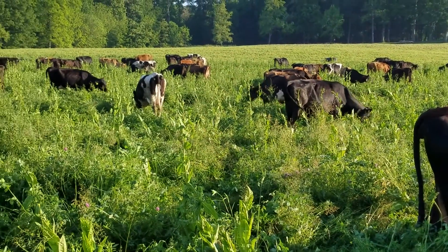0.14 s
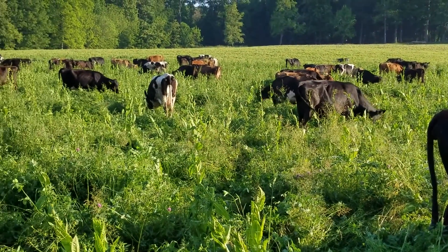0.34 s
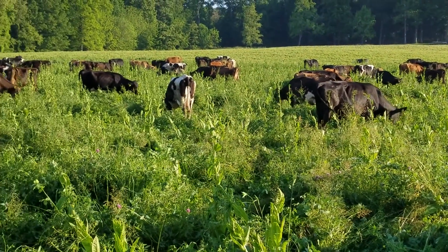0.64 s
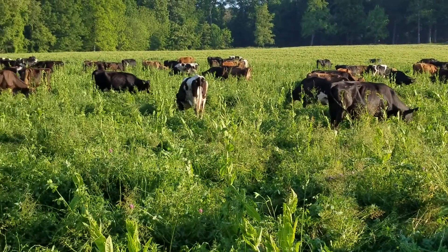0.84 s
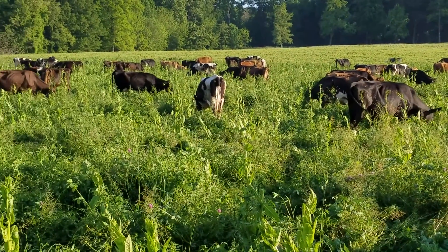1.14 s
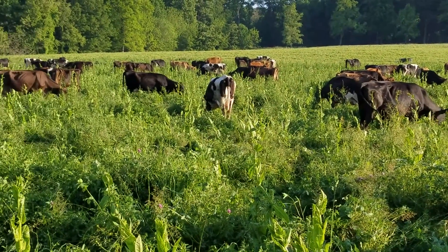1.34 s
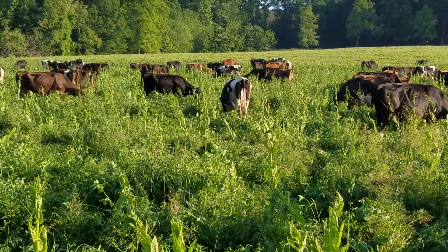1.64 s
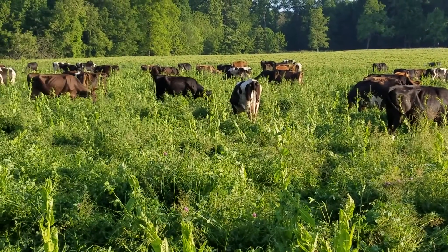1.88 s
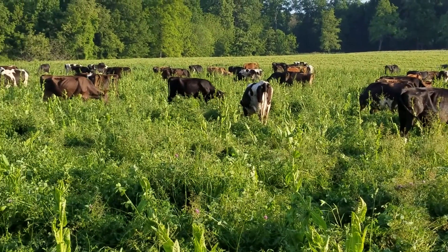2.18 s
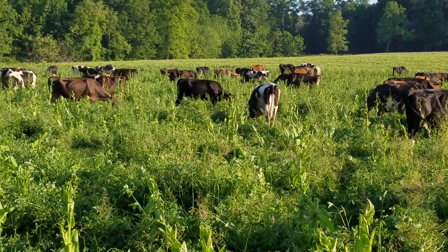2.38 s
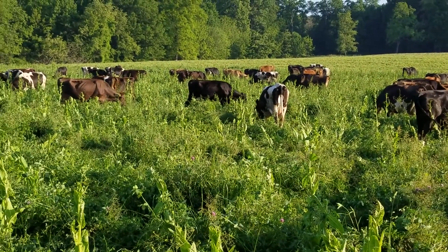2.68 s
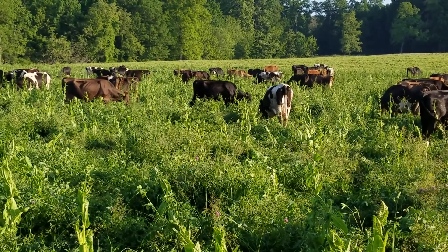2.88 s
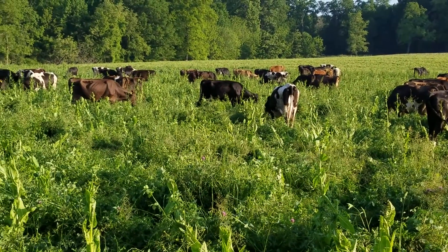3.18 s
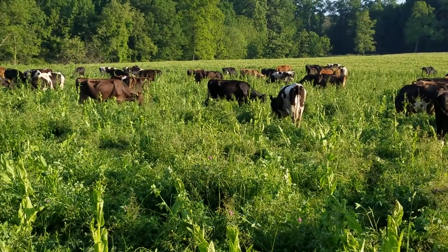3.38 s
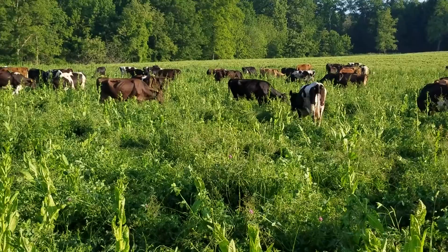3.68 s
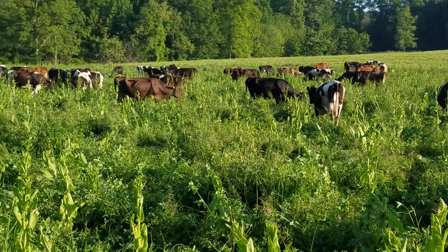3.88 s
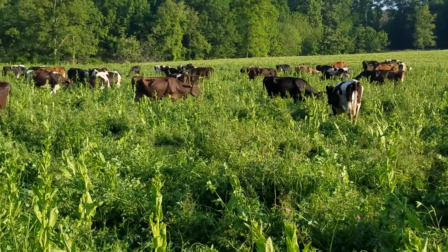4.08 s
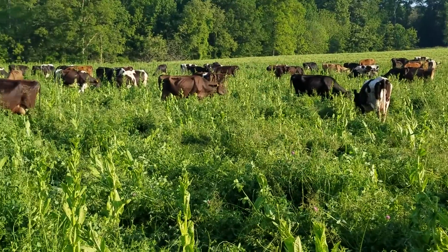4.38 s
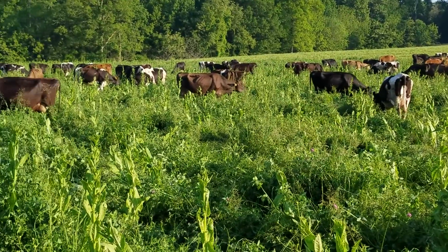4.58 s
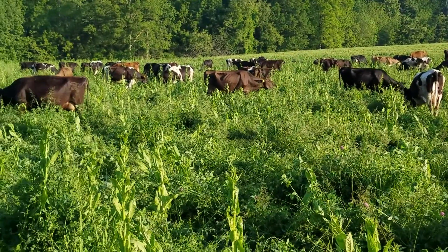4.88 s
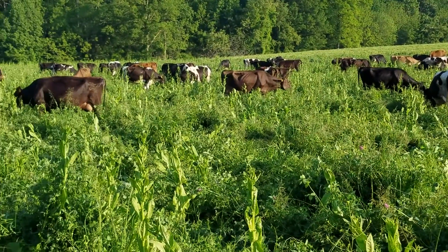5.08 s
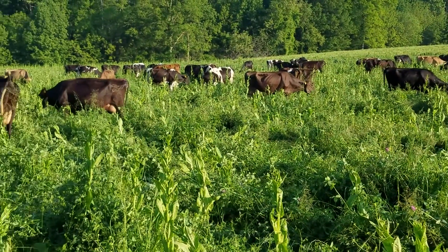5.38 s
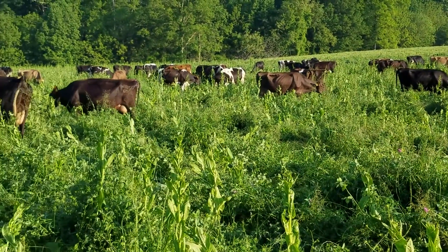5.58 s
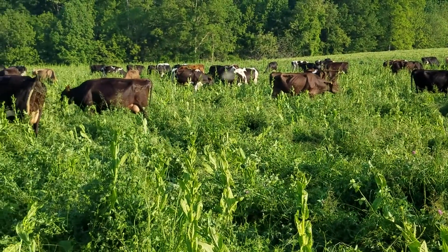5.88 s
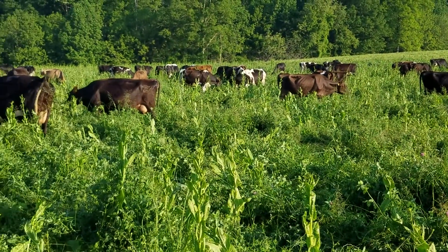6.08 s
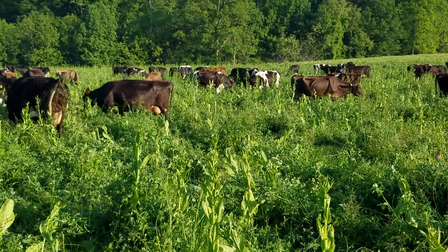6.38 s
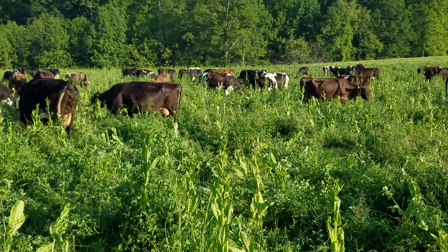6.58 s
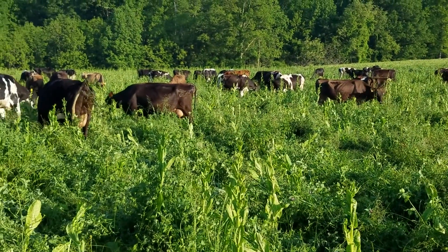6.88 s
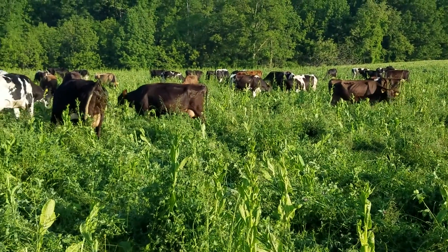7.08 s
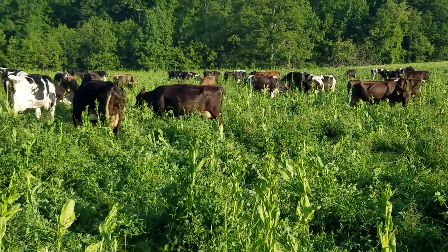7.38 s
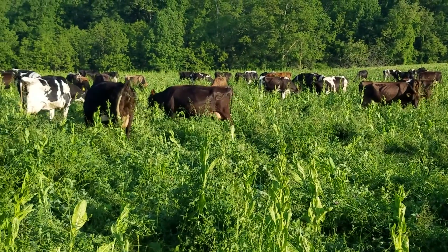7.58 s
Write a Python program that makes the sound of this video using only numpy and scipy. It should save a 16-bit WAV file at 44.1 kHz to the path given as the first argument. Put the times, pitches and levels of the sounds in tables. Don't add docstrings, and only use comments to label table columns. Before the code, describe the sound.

Cows tear grass in crisp crackling bursts and stem snaps while small birds whistle and chip over a low, distant engine drone.

```python
import sys
import numpy as np
from scipy import signal
from scipy.fft import rfft, irfft
from scipy.io import wavfile

SR = 44100
rng = np.random.default_rng(int(sys.argv[2]) if len(sys.argv) > 2 else 0)


def unload_audio(sound):
    columns = np.transpose(np.atleast_2d(sound))
    steps = np.round(np.clip(columns, -1, 1) * 32767)
    wavfile.write(sys.argv[1], SR, steps.astype(np.int16))


def to_linear_factor(level_db):
    exponent = np.asarray(level_db, float) / 20
    return 10 ** exponent


N = 341404

# frequency in Hz, left and right density in dB per Hz, likeness 0-1.
DRONE_DENSITY = [(23, -79.5, -84.5, 0.99), (40, -70, -66, .995), (56, -58, -61, 1), (96.3, -59, -59.5, 1),
                 (136.7, -66, -67, 0.96), (166.7, -65.5, -69, 0.98), (185.6, -75.5, -77, 0.95),
                 (326, -79, -78.5, 0.7), (463, -80.5, -79, 0.85), (610, -82.5, -81, 0.27),
                 (985, -81, -80.5, 0.93), (1570, -91.5, -85.5, 0.56), (1950, -89, -88.5, 0.5),
                 (2344, -102, -102, 0.02)]
# frequency in Hz, wander in Hz, level in dB rms.
ENGINE_ORDERS = [(80.7, .9, -47.5), (120, 3.0, -50), (145.3, .35, -49), (161.8, .6, -50.5), (217, 4.0, -63),
                 (473.7, .25, -64), (524, 2.0, -68)]
# frequency in Hz, lead in radians.
PORT_LEAD = [(0, 0), (340, .5), (1120, 3), (1890, 6), (2600, 8)]
# frequency in Hz, left and right density in dB per Hz.
HUSH_DENSITY = [(2120, -94.5, -97), (2300, -96, -99), (2760, -96.5, -99.2), (3400, -104.6, -99.8),
                (3900, -107.2, -102.2), (4630, -109.2, -106.9), (5870, -114.7, -111.0),
                (7200, -118.3, -113.4), (8350, -121.5, -111.6), (10420, -121.0, -106.6),
                (11500, -116.6, -111.3), (12800, -110.4, -113.4), (14200, -112.5, -111.8),
                (15400, -110.7, -110.3)]
# frequency in Hz, left and right gain in dB.
PORT_COLOUR = [(1383, 0.5, 0), (2900, -1, -2.5), (3700, -4.5, 2), (4050, -6.5, 0), (4800, 1.5, -1.5),
               (5500, 0.5, 2.5), (6530, 1, 2), (7400, 0, 4.5)]

# start after the syllable in seconds, length in seconds,
# start and end pitch in Hz, level in dB rms.
ZIGZAG = [(0, 0.05, 6650, 7660, -72.5), (.06, .022, 5280, 5800, -68), (.078, 0.0177, 5800, 5830, -66),
          (.094, .018, 5500, 4350, -63), (.108, .022, 4350, 3350, -57), (.157, 0.027, 4616, 4676, -59.5)]
ARCH = [(0.0029, 0.066, 5630, 6150, -62)]
HUMP = [(0, 0.042, 3250, 4450, -53), (.026, .05, 4050, 4980, -59.5), (.066, .03, 4950, 4800, -65),
        (.086, 0.042, 4620, 4000, -56)]
VEE = [(0, 0.024, 4250, 3238, -54.5), (.052, 0.053, 3400, 4220, -55)]
FALL = [(0, .022, 4950, 4050, -63), (.014, 0.026, 4220, 3500, -60.5)]
CLIMB = [(0, 0.056, 2900, 3950, -60.5), (.04, .048, 3660, 4900, -66)]
CHIP = [(-.006, 0.01607, 3290, 4140, -65), (0, .025, 3746, 5020, -56), (.021, 0.011, 5080, 3930, -63)]
WIGGLE = [(.008, .018, 3570, 2650, -59), (.021, .014, 2750, 3150, -54), (.03, .012, 3150, 2750, -60),
          (.041, .026, 2700, 3230, -52.5), (.057, .022, 3080, 3600, -57), (.077, .016, 3180, 2700, -56.5)]
CHUP = [(-.008, .014, 3550, 2900, -55), (.002, 0.0191, 2993, 2760, -60), (.024, .012, 3050, 2750, -62)]
SLIDE = [(0, 0.054, 3820, 3200, -53.5)]
DROP = [(0.0011, 0.049, 5700, 2400, -64)]
TICK = [(0, 0.018, 3524, 4750, -57.5), (.017, 0.0159, 4760, 3170, -60.5)]
WHISTLE = [(0, .031, 4900, 5300, -64), (.094, .15, 5220, 4850, -66)]
# start in seconds, length in seconds, start and end pitch in Hz, level in dB rms.
DROOP = [(4.535, 0.13, 4820, 4810, -67.5)]
LONE_RIGHT = [(.015, .04, 3990, 3930, -65), (1.345, .03, 5200, 5050, -73), (1.395, 0.062, 4353, 4200, -62),
              (1.74, 0.028, 3800, 3740, -65), (3.05, 0.016, 3620, 2700, -54.5),
              (3.6, 0.043, 3720, 3760, -74), (3.895, .016, 5000, 4700, -67),
              (4.62, 0.045, 2120, 2400, -68.5), (4.665, .02, 4730, 4600, -65),
              (4.703, 0.02, 3880, 3880, -57), (2.728, .022, 4350, 4600, -58), (2.29, .03, 3200, 3100, -63),
              (3.55, .012, 4300, 3900, -65), (3.672, .012, 4300, 3900, -65), (5.64, .014, 4236, 3750, -68),
              (5.81, .02, 4155, 4100, -67.5), (6.04, 0.0155, 3900, 4700, -59.5),
              (6.14, .022, 5600, 5300, -70), (6.158, .028, 5280, 5600, -68),
              (6.362, 0.028, 3980, 3700, -67), (6.825, .014, 4450, 4900, -61),
              (6.834, 0.0284, 4880, 4933, -61.5), (7.056, 0.04, 2470, 2380, -50)]
LONE_LEFT = [(.81, 0.014, 3200, 3100, -66.5), (2.965, .02, 2750, 2716, -66),
             (4.855, 0.045, 3500, 3010, -64), (5.4, 0.038, 2850, 3360, -62), (5.552, .022, 3050, 2900, -60),
             (5.712, 0.13, 2460, 2330, -64.5), (6.41, .03, 3300, 3300, -67), (6.55, 0.395, 2700, 2720, -75),
             (6.78, .03, 3300, 3320, -65), (6.89, 0.102, 2727, 2760, -68.5), (7.15, .048, 1634, 1634, -53)]
GURGLE = [
    (7.065, 0.045, 2107, 2210, -51.5),
    (7.2, 0.016, 1980, 2470, -50),
    (7.224, 0.013, 4750, 5600, -58),
]
# (start in seconds, level in dB).
BUNTING = [(ZIGZAG, 36, [(1.552, -2.5), (1.815, -1), (2.08, 0)]), (SLIDE, 260, [(2.347, -1.5),
           (2.583, 0.5)]), (ARCH, 550, [(2.435, -4), (2.672, -2.5)]), (DROP, 0, [(2.491, -1), (2.728, -7)]),
           (HUMP, 123, [(2.826, 0)]), (VEE, 58, [(3.093, -0.5), (3.296, -1.5)]), (FALL, -120, [(3.63, -0.5),
           (3.9, -1.5), (3.988, 2), (4.265, -5), (4.375, -4.5), (4.395, -8), (4.755, -1)]),
           (CLIMB, -150, [(3.742, -1.5), (4.105, -1.5), (4.462, 2.5), (4.872, -1)])]
SPARROW = [(WIGGLE, -22.5, [(.257, -8.5), (.545, -9), (1.503, -5), (2.445, -3), (3.38, -0.5), (4.42, -9.5),
           (6.962, -2)]), (CHUP, -44, [(1.08, -9), (1.199, 0.5), (3.925, 1), (4.9, 1), (6.436, 3)])]
SWALLOW = [(CHIP, -150, [(2.568, -13), (2.644, -2.5), (2.722, -4), (2.8, -2), (2.878, -2), (2.958, 1.5),
           (3.037, -1), (3.12, 3), (3.202, 3.5), (3.29, -6), (3.472, -6), (3.503, -3.5), (5.452, -5)]),
           (TICK, 0, [(3.558, -4), (3.652, -3), (3.735, 1), (3.822, 1), (3.918, 2), (4.016, 7),
           (4.115, 6.5), (4.222, 3.5), (4.349, 4), (4.692, 1.5), (4.885, 1)])]
# start in seconds, top pitch in Hz, level in dB.
SLURS = [(7.232, 5600, -62), (7.243, 5750, -65), (7.253, 5800, -65), (7.263, 5500, -66), (7.272, 5300, -68),
         (7.282, 5000, -71)]
# start in seconds, level in dB.
PIPS = [(7.302, -48), (7.3342, -45), (7.364, -47), (7.395, -45.5), (7.426, -48), (7.458, -46),
        (7.493, -43.5), (7.526, -44), (7.561, -44.5), (7.597, -45), (7.635, -44.5), (7.671, -45),
        (7.709, -45)]
# overtone number, left and right level in dB.
TRILL_OVERTONES = [(4, -78, -82), (5, -68.5, -72.5), (6, -79, -72), (7, -72.5, -82), (8, -90, -90),
                   (9, -81, -71.5)]

# time in seconds, level in dB.
SWISH_LEVEL = [(0, -58), (.1, -58.5), (.2, -63), (.35, -72.5), (.6, -80), (1.0, -83), (3.0, -74),
               (5.0, -74), (7.74, -71)]
# frequency in Hz, left and right density in dB per Hz.
STEM_DENSITY = [(1990, -102.1, -98.5), (2400, -103.0, -99.6), (2840, -100.6, -100.0), (3400, -105.9, -99.5),
                (3900, -106.6, -100.2), (4350, -111.4, -107.4), (5600, -119.2, -111.9),
                (7050, -120.1, -110.5), (8620, -130.4, -103.7), (10326, -130.1, -95),
                (11230, -115.0, -99.6), (12760, -103.9, -105.5), (13800, -109.0, -103.6),
                (15500, -101.6, -102.3)]
# time in seconds, level in dB.
HERD_EFFORT = [(0, -68), (.7, -72), (1.6, -74), (2.1, -71), (3.2, -75.5), (4.5, -73.5), (5.1, -83),
               (6.4, -81), (7.0, -76), (7.74, -71)]
# strongest pull in seconds, peak in dB, fade in seconds per 10 dB.
BITES = [(.174, -66.5, 0.07), (.51, -63, 0.05), (.76, -68, .04), (.818, -60, 0.035), (.87, -66, .06),
         (.9, -75, 0.6), (1.289, -70, 0.16), (1.372, -61.5, -0.04), (1.491, -65, .035), (1.61, -75, 0.12),
         (1.658, -61.5, -0.07), (1.708, -61, 0.04), (2.081, -63, 0.02), (2.417, -79, 0.2), (2.63, -67, 0.2),
         (3.037, -51, 0.0547), (3.428, -66.5, .2), (3.765, -56.5, 0.07), (3.83, -65, 0.04),
         (3.865, -66, .03), (4.111, -68, 0.1), (4.22, -72, 0.08), (4.402, -62, .03), (4.46, -65, .07),
         (4.608, -66, 0.03), (4.783, -67, 0.085), (4.931, -69, -0.16), (5.402, -69, .22),
         (5.753, -68, 0.08), (6.192, -67.5, .2), (6.555, -59, 0.045), (6.625, -69, .03), (6.92, -68, 0.15),
         (7.085, -63, 0.06), (7.268, -62, .03), (7.315, -59, 0.04)]
# start in seconds, peak in dB, left minus right in dB, fade in seconds.
SNAPS = [(0.04, -49, -8.5, 0.003), (0.2488, -48, -7.5, 0.0031), (0.2967, -50.5, -6.5, 0.003),
         (0.4968, -53, -7.0, 0.003), (0.7467, -53, -9, 0.003), (0.8001, -53.5, -11, 0.003),
         (0.8121, -48, -7.5, 0.003), (0.9163, -53, -7.0, 0.003), (1.3628, -56, -5.0, 0.003),
         (1.3683, -50, -8, 0.003), (1.4368, -47, -6.0, 0.0033), (1.483, -45.5, -15.5, 0.0037),
         (1.5145, -57, -7.0, 0.0027), (1.5963, -54.5, -8.0, 0.003), (1.6222, -46, -10, 0.003),
         (1.6524, -44.5, -12, 0.003), (1.6955, -53, -8.5, 0.0024), (1.7382, -45.5, -10, 0.003),
         (1.8577, -51, -10, 0.003), (2.023, -54, -10.5, 0.003), (2.0732, -55, -8.5, 0.003),
         (2.372, -54.5, -10, 0.00315), (2.9901, -60, -9.0, 0.003), (3.0215, -44.5, -13.5, 0.003),
         (3.1368, -57, -7.5, 0.003), (3.7459, -52.5, -10.0, 0.003), (3.8062, -52, -9.5, 0.003),
         (3.8242, -51, -7.0, 0.003), (3.8556, -47, -4.5, 0.003), (4.0871, -58.5, -6.5, 0.003),
         (4.1071, -51, -8.5, 0.003), (4.3952, -46, -10, 0.0036), (4.4343, -57.5, -6.0, 0.003),
         (4.4498, -48, -3.5, 0.003), (4.5665, -52, -7, 0.0032), (4.5905, -53, -1.0, 0.003),
         (4.6169, -48.5, 2, 0.003), (4.9322, -55, -6.0, 0.003), (5.1029, -53, -5.5, 0.003),
         (5.4056, -50, -6.5, 0.003), (5.7109, -53.5, -4, 0.003), (5.7453, -52, 1, 0.003),
         (5.8601, -58, -5.0, 0.003), (6.155, -47, -6, 0.003), (6.1774, -50, -9.5, 0.003),
         (6.5316, -49, -8, 0.0032), (7.0868, -55, -8.5, 0.003), (7.1292, -60, -7.0, 0.003),
         (7.2394, -52, -4.5, 0.003), (7.2596, -44, -10.5, 0.0035)]
# start in seconds, peak in dB, left minus right in dB.
KNOCKS = [(.917, -58, -3), (1.484, -58, -4), (1.60, -58, 3), (1.73, -57, -5), (2.075, -57, -3),
          (3.856, -59, -2), (4.025, -55, 8), (4.398, -58, -5), (7.161, -50, -4)]
# start in seconds, peak in dB, left minus right in dB, fade in seconds.
TEARS = [(.812, -56, 4, .008), (.834, -65, 4, .004), (.917, -66, 3, .003), (3.747, -62, 4, .010),
         (3.778, -64, 4, .004), (3.835, -63, 4, .006), (3.87, -66, 4, .004), (4.45, -63, 3, .004),
         (4.59, -65, 4, .008), (4.617, -60, 4, .005), (7.3, -65, 3, .012)]

TRILL_HZ = 567.3
SWALLOW_FROM_S, SWALLOW_PAN_DB, SWALLOW_PAN_DB_PER_S = 2.77, 4, -21
BITE_RISE_SHARE = 0.43
SNAP_CUT_HZ, TEAR_CUT_HZ = 5800, 11000
KNOCK_FADE_S = 0.00284


def in_time(rows):
    s, db = np.transpose(rows)
    return np.interp(np.arange(N) / SR, s, db)


def drift(rate):
    r = np.exp(-80 * np.pi * rate / SR)
    white = rng.standard_normal(N // 40 + 2002)
    slow = signal.lfilter([1], [1, -2 * r, r * r], white)[2000:]
    return np.interp(np.arange(N) / 40, np.arange(len(slow)), slow / slow.std())


def colour(x, table, column, below_db, size=8192):
    log_hz = np.log(np.arange(size // 2 + 1) * SR / size + 1)
    rows = np.array(table)
    knots = np.log(np.r_[rows[0, 0] * .7, rows[:, 0], rows[-1, 0] * 1.6])
    knot_db = np.r_[rows[0, column] + below_db, rows[:, column], rows[-1, column] - 30]
    db = np.interp(log_hz, knots, knot_db)
    cepstrum = irfft(np.log(to_linear_factor(db) * np.sqrt(SR / 2)))
    cepstrum[1:size // 2] *= 2
    cepstrum[size // 2 + 1:] = 0
    impulse = irfft(np.exp(rfft(cepstrum)))
    looped = np.tile(x, 2)[N - size:]
    return signal.oaconvolve(looped, impulse)[size:size + N]


def filtered(x, order, hz, kind):
    return signal.sosfilt(signal.butter(order, hz, kind, fs=SR, output="sos"), x)


def delay(x, s):
    return np.interp(np.arange(N) - s * SR, np.arange(N), x)


def size_of(s):
    return max(round(s * SR), 8)


def drone():
    table = np.array(DRONE_DENSITY)
    alike = np.clip(table[:, 3:], .01, .995)
    direct = table[:, :3] + 10 * np.log10(alike) * [0, 1, 1]
    diffuse = table[:, :3] + 10 * np.log10(1 - alike) * [0, 1, 1]
    shared, *own = rng.standard_normal((3, N))
    orders = np.zeros(N)
    for hz, wander_hz, db in ENGINE_ORDERS:
        phase = 2 * np.pi * np.cumsum(hz + wander_hz * drift(2.944)) / SR
        orders += np.sqrt(2) * to_linear_factor(db + 1.8 * drift(2.5)) * np.sin(phase)
    left = colour(shared, direct, column=1, below_db=-23) + to_linear_factor(0.37) * orders
    right = colour(shared, direct, column=2, below_db=-23) + to_linear_factor(-0.29) * orders
    lead = np.interp(np.arange(N // 2 + 1) * SR / N, *np.transpose(PORT_LEAD))
    late_right = irfft(rfft(right) * np.exp(-1j * lead), N)
    scattered = [colour(own[k], diffuse, column=k + 1, below_db=-31) for k in range(2)]
    return np.array([left, late_right]) + scattered


def hush():
    white = rng.standard_normal((2, N)) * to_linear_factor(0.78 + 0.077 * drift(4.0))
    return np.array([colour(white[k], HUSH_DENSITY, column=k + 1, below_db=-6.5) for k in range(2)])


def add_note(track, s, length, start_hz, middle_hz, end_hz, db):
    u = np.linspace(-1, 1, size_of(length))
    bend_hz = (start_hz + end_hz) / 2 - middle_hz
    hz = middle_hz + (end_hz - start_hz) / 2 * u + bend_hz * u * u
    swell = np.cos(np.pi / 2 * u).clip(0) ** min(.9, 0.023 / length)
    note = to_linear_factor(db) * np.sqrt(2) * swell * np.sin(2 * np.pi * np.cumsum(hz) / SR)
    at = round(s * SR)
    track[at:at + len(u)] += note


def heard(track, left_db, right_db, lag_s, echo_db):
    t = np.arange(size_of(.25)) / SR
    trees = rng.standard_normal((2, len(t))) * np.exp(-t / .03) * (1 - np.exp(-t / .002))
    trees /= np.linalg.norm(trees, axis=1, keepdims=True)
    direct = np.array([delay(track, max(lag_s, 0)), delay(track, max(-lag_s, 0))])
    echo = signal.oaconvolve(track[None], trees, axes=1)[:, :N]
    both = direct + to_linear_factor(echo_db) * echo
    ported = [colour(both[k], PORT_COLOUR, column=k + 1, below_db=2, size=1024) for k in range(2)]
    return np.array(ported) / np.sqrt(SR / 2) * to_linear_factor(np.array([[left_db], [right_db]]))


def sing(song, **place):
    track = np.zeros(N)
    for syllable, bow_hz, starts in song:
        for s, db in starts:
            for after_s, length, start_hz, end_hz, note_db in syllable:
                middle_hz = (start_hz + end_hz) / 2 + bow_hz
                add_note(track, s + after_s, length, start_hz, middle_hz, end_hz, note_db + db)
    return heard(track * to_linear_factor(2.5 * drift(55)), **place)


def wood_edge_birds():
    once = [(0, 0)]
    right_side = BUNTING + [(LONE_RIGHT, 0, once)]
    left_side = SPARROW + [(LONE_LEFT, 0, once)]
    calls = [(GURGLE, 0, once), (WHISTLE, -40, [(4.309, 0)]), (DROOP, 100, once)]
    birds = sing(right_side, left_db=-9.5, right_db=0, lag_s=-.0003, echo_db=-7)
    birds += sing(left_side, left_db=0, right_db=-3, lag_s=.00072, echo_db=-8)
    birds += sing(calls, left_db=-4.5, right_db=0, lag_s=.0006, echo_db=-10)
    return birds


def blackbird():
    track, t = np.zeros(N), np.arange(N) / SR
    for s, top_hz, db in SLURS:
        add_note(track, s, .009, top_hz, top_hz * .8, top_hz * .62, db + 4)
        add_note(track, s + .004, .007, 3350, 3000, 2750, db + 12)
    open_beak = np.clip((t - 7.295) / 0.018, 0, 1)
    for s, db in PIPS:
        add_note(track, s - .001, .009, 3150, 3000, 2800, db - 7)
        add_note(track, s, .009, 2800, 2680, 2520, db - 10)
        open_beak *= 1 - np.exp(-((t - s - .003) / .0055) ** 4)
    phase = 2 * np.pi * np.cumsum(TRILL_HZ + 1.25 * drift(6.6)) / SR
    buzz = np.zeros((2, N))
    for overtone, left_db, right_db in TRILL_OVERTONES:
        level_db = np.array([[left_db], [right_db]]) + 9.0 + 1.8 * drift(18)
        buzz += to_linear_factor(level_db) * np.sin(round(overtone) * phase)
    left, right = open_beak * buzz
    whistles = heard(track, left_db=0, right_db=-1, lag_s=.00067, echo_db=-7)
    return whistles + [delay(left, .00066), right]


def swallow():
    flown_s = (np.arange(N) / SR - SWALLOW_FROM_S).clip(0, 1)
    pan_db = SWALLOW_PAN_DB + SWALLOW_PAN_DB_PER_S * flown_s
    chips = sing(SWALLOW, left_db=-4.0, right_db=-4.5, lag_s=.00002, echo_db=-4)
    return chips * to_linear_factor(np.array([pan_db, 0 * pan_db]))


def swish():
    band = filtered(rng.standard_normal((2, N)), 2, [1500, 2000], "band")
    level_db = in_time(SWISH_LEVEL) + 1.5 * drift(25) + np.array([[-1.5], [2.5]])
    return band / band.std() * to_linear_factor(level_db)


def puffs(events, offset_db):
    out, t = np.zeros((2, N)), np.arange(size_of(.03)) / SR
    for s, db, pan_db, fade_s in events:
        at = round(s * SR)
        peak = to_linear_factor(db + offset_db + np.array([[pan_db], [-pan_db]]) / 2)
        out[:, at:at + len(t)] += peak * np.exp(-t / np.clip(fade_s, .0005, .012))
    return out


def effort_db():
    total, t = to_linear_factor(in_time(HERD_EFFORT)), np.arange(N) / SR
    for s, db, fade_s in BITES:
        away = np.maximum((t - s) / fade_s, (s - t) / (BITE_RISE_SHARE * fade_s))
        total += to_linear_factor(db - 10 * away.clip(0, 9))
    return 20 * np.log10(total)


def fibre_crackle():
    born = rng.random((3, N)) < 1100 * to_linear_factor(1.8 * drift(40)) / SR
    sizes = born * to_linear_factor(2.6 * np.minimum(rng.exponential(1, (3, N)), 5))
    breaks = sizes[0] + 0.71 * sizes[1:]
    fibres = signal.lfilter([1], [1, -np.exp(-1 / (0.0026 * SR))], breaks)
    envelope = 0.58 + fibres / np.sqrt(np.mean(fibres ** 2))
    return rng.standard_normal((2, N)) * envelope * to_linear_factor(effort_db() + 59.0)


def stem_snaps():
    noise = rng.standard_normal((2, N)) * puffs(SNAPS, 59.6) * to_linear_factor(np.array([[6.0], [-4.0]]))
    return filtered(noise, 1, SNAP_CUT_HZ, "high")


def stalks_and_blades():
    white = rng.standard_normal((2, N))
    stalks = [row + (KNOCK_FADE_S,) for row in KNOCKS]
    knocks = filtered(white * puffs(stalks, 10.1), 2, [2400, 4800], "band")
    return knocks + filtered(white * puffs(TEARS, 4.0), 4, TEAR_CUT_HZ, "high")


def grazing():
    excite = fibre_crackle() + stem_snaps()
    torn = [colour(excite[k], STEM_DENSITY, column=k + 1, below_db=-3.0) for k in range(2)]
    return stalks_and_blades() + torn


def scene():
    birds = wood_edge_birds() + blackbird() + swallow()
    return drone() + hush() + birds + swish() + grazing()


def top_cut(x):
    return signal.sosfilt(signal.butter(12, 16930, fs=SR, output="sos"), x)


def record(dry):
    cut = signal.sosfilt(signal.ellip(12, .5, 70, 15780, fs=SR, output="sos"), dry)
    mix = cut - .0006
    return top_cut(mix)


dry = scene()
out = record(dry)
unload_audio(out)
```